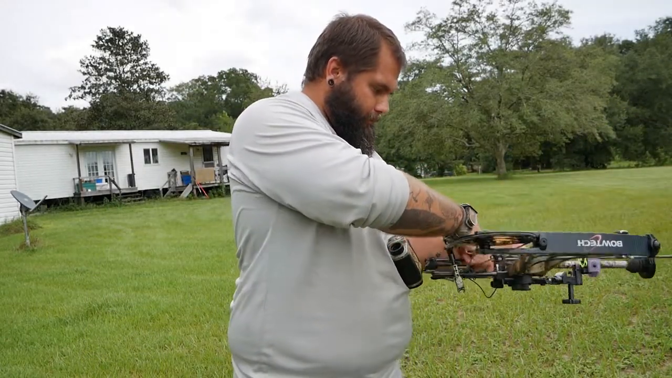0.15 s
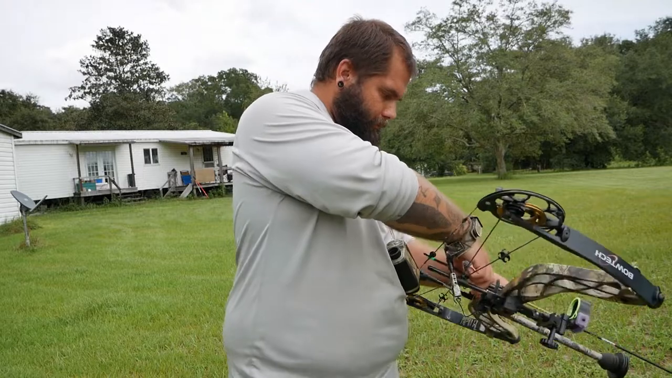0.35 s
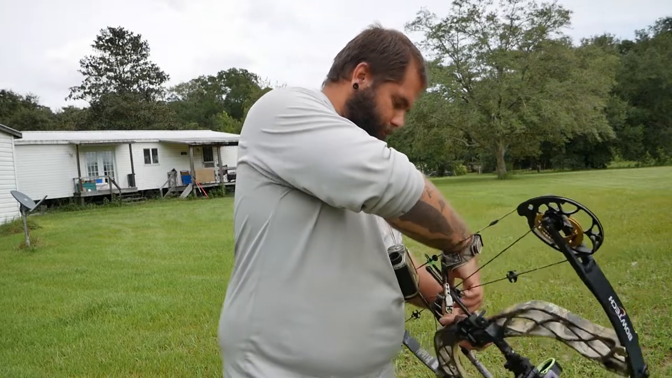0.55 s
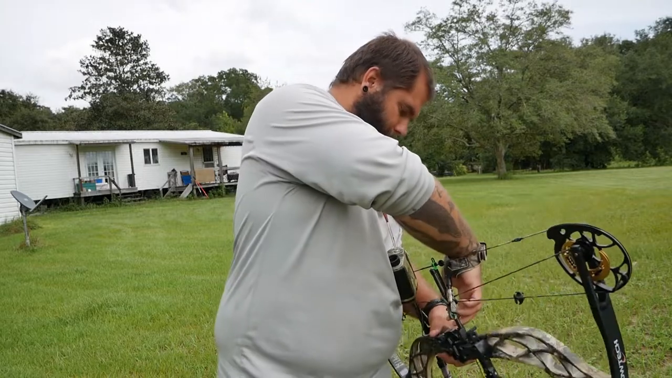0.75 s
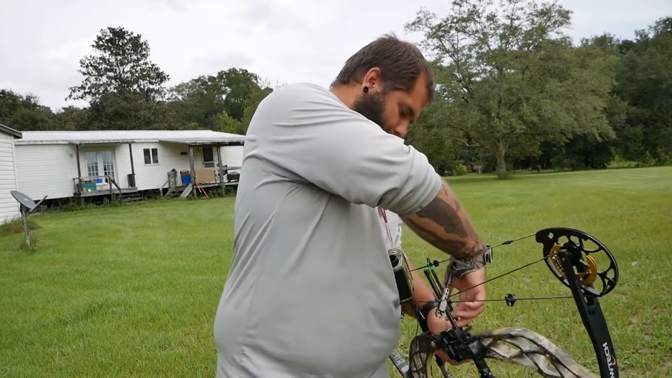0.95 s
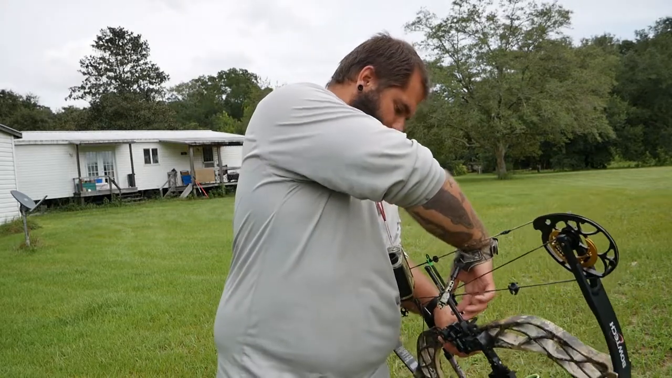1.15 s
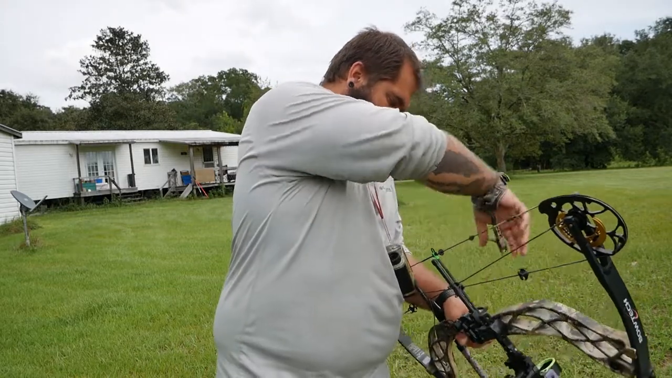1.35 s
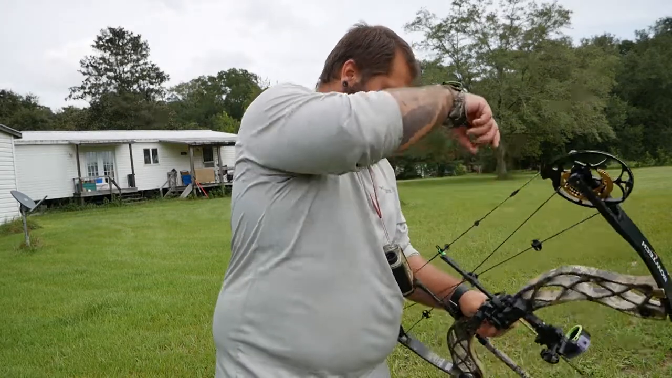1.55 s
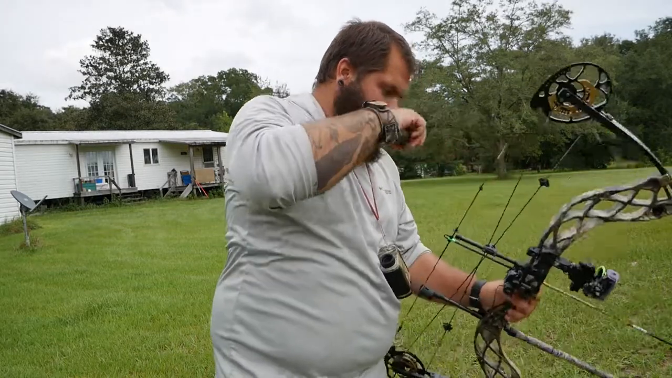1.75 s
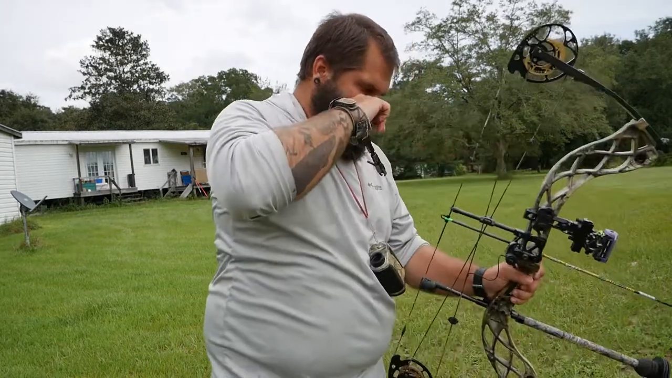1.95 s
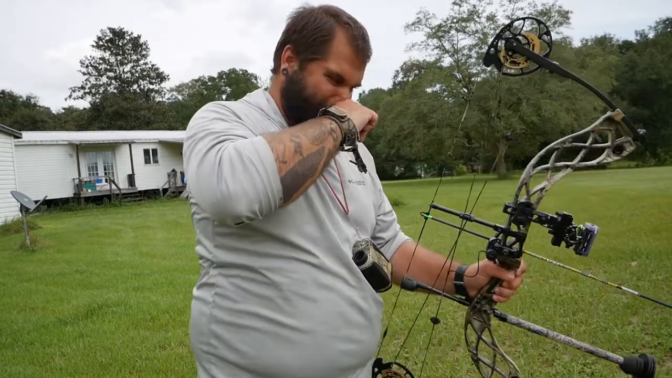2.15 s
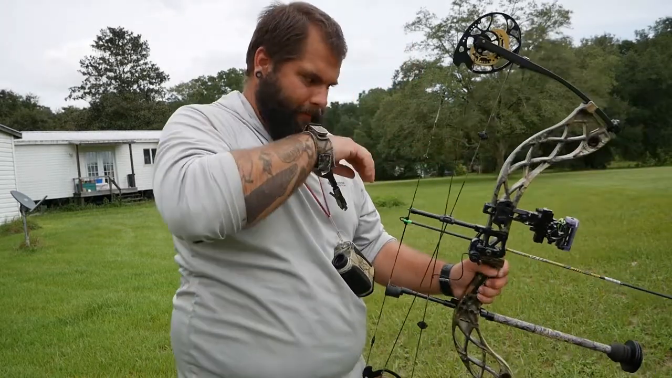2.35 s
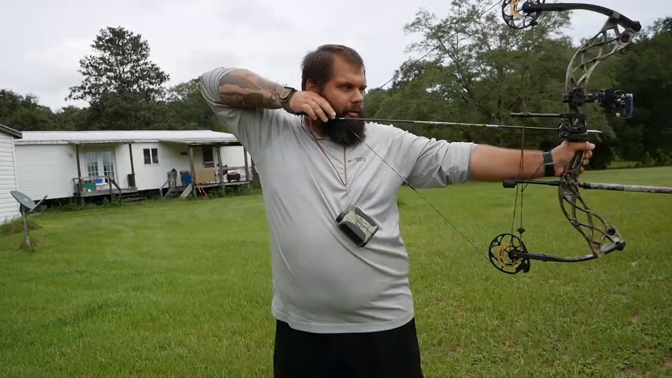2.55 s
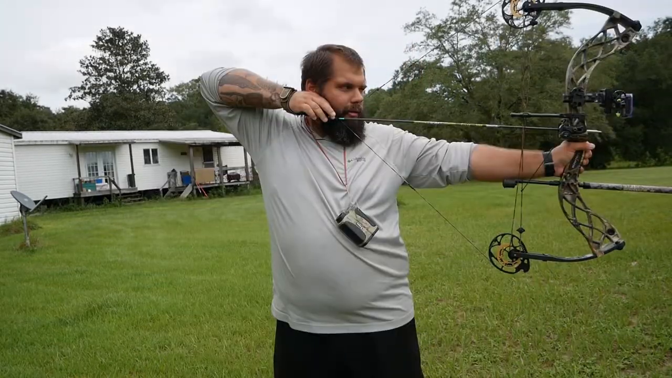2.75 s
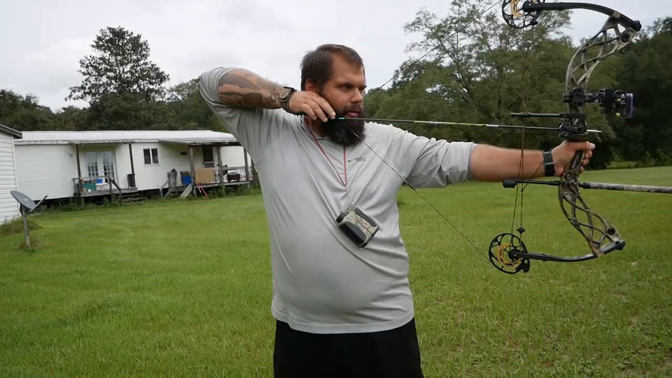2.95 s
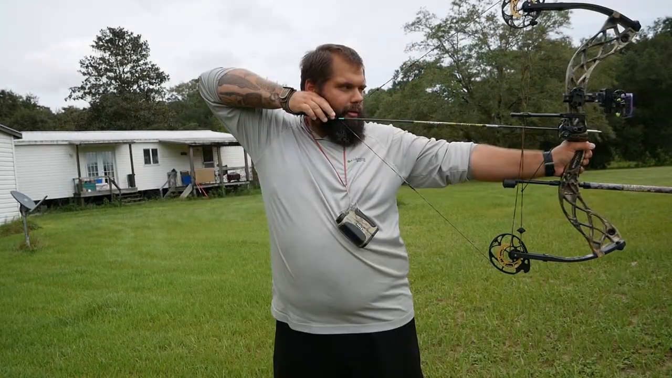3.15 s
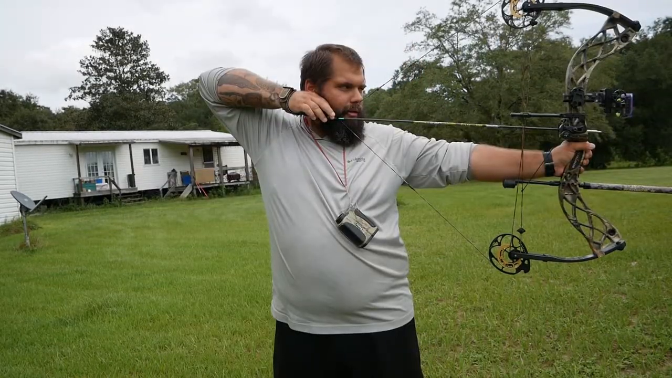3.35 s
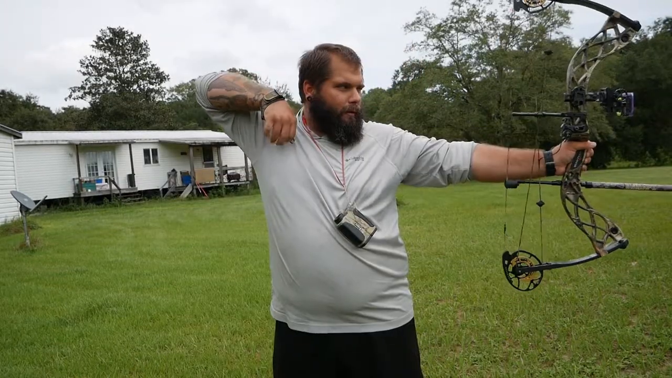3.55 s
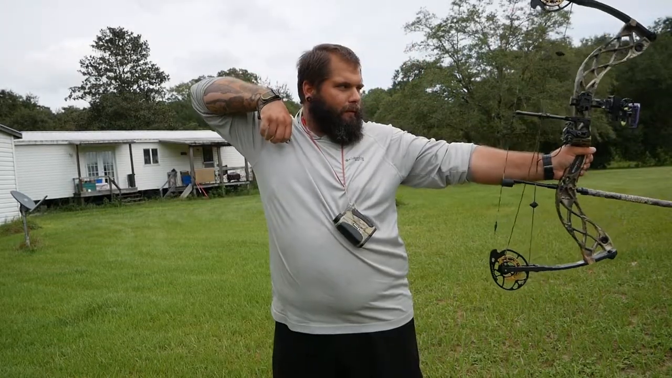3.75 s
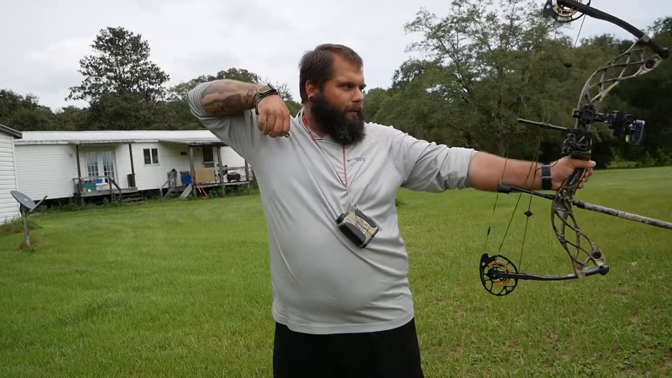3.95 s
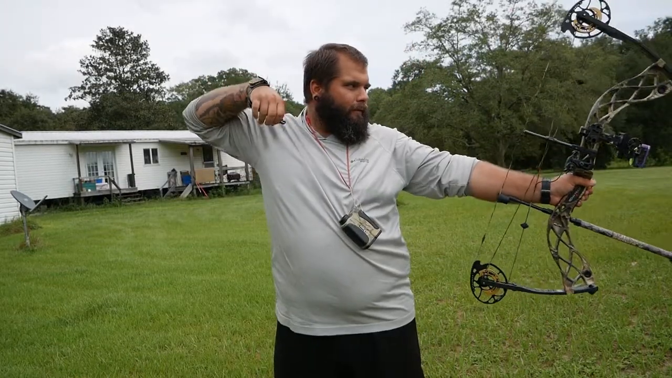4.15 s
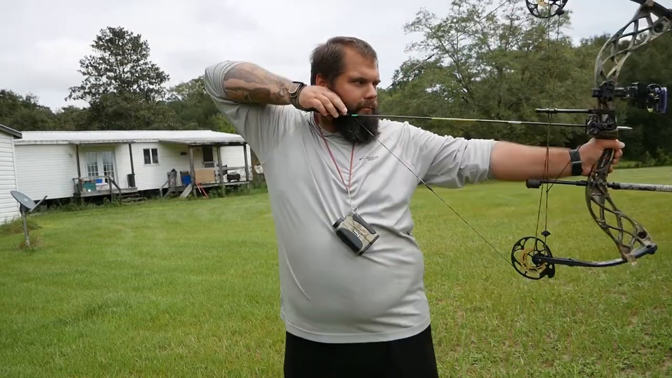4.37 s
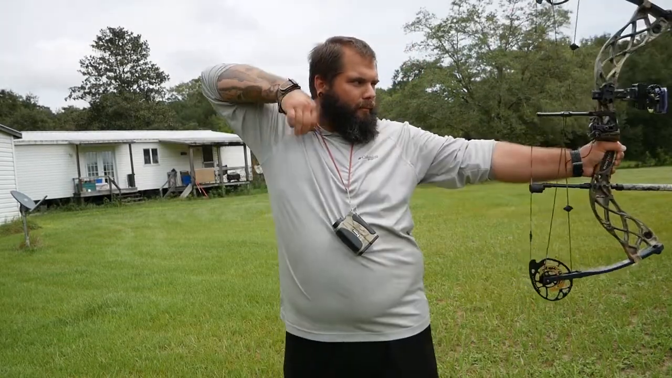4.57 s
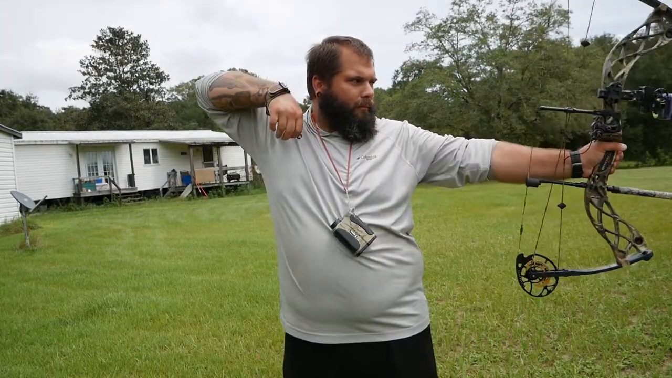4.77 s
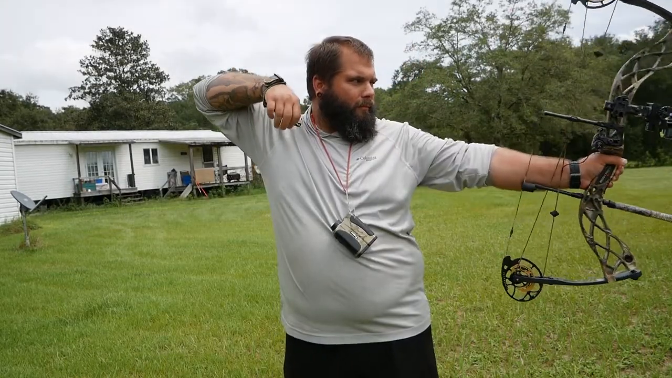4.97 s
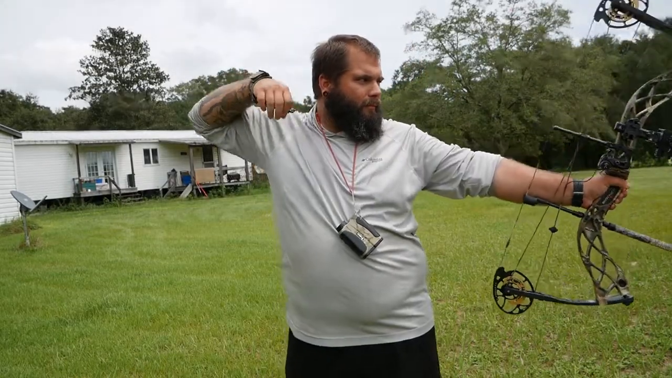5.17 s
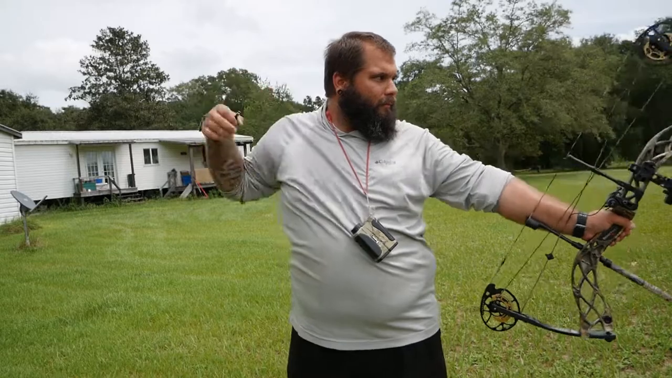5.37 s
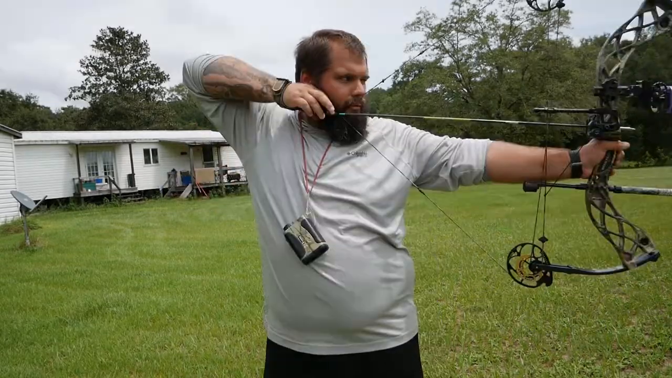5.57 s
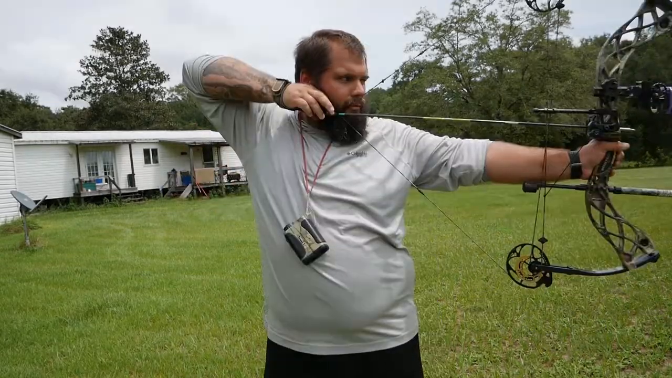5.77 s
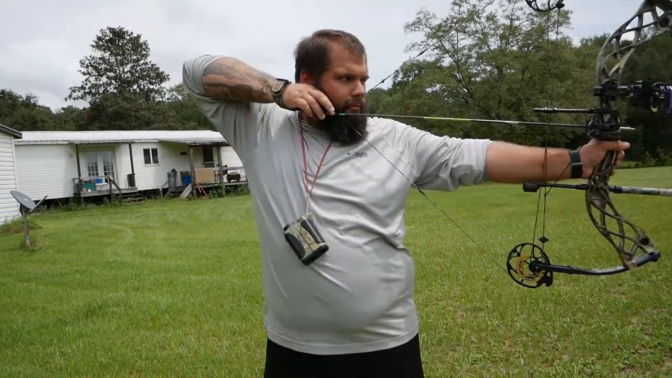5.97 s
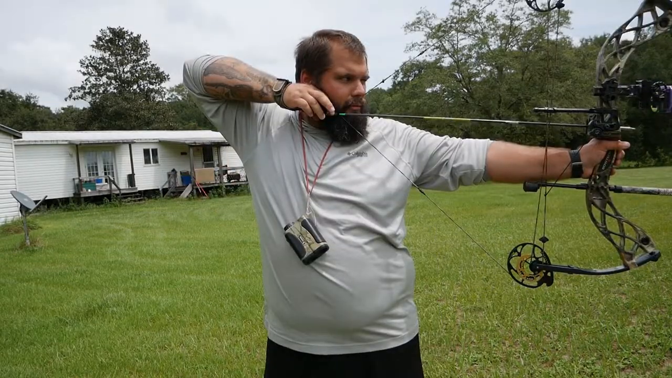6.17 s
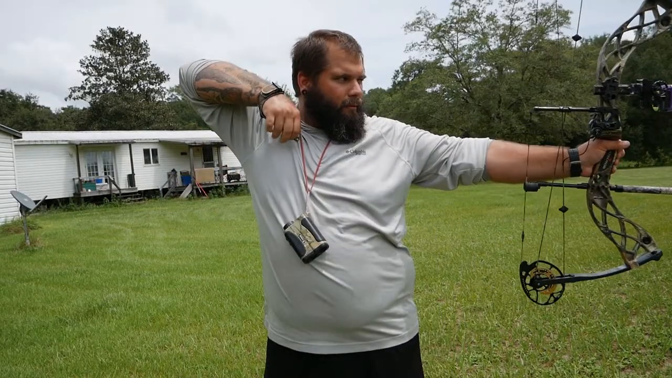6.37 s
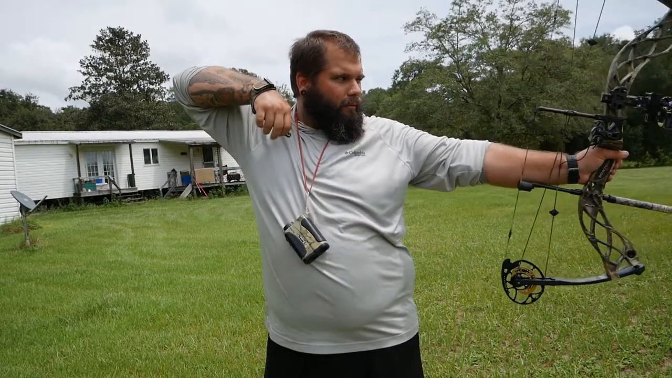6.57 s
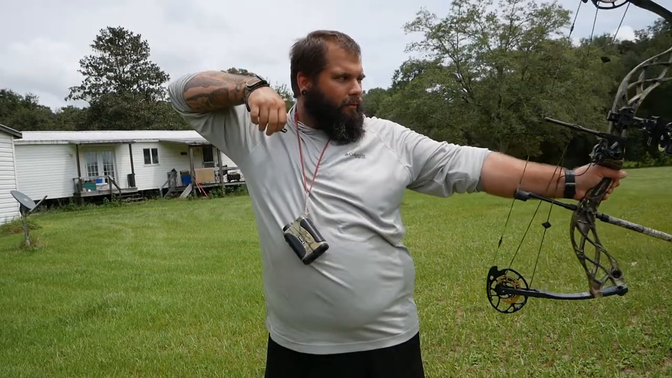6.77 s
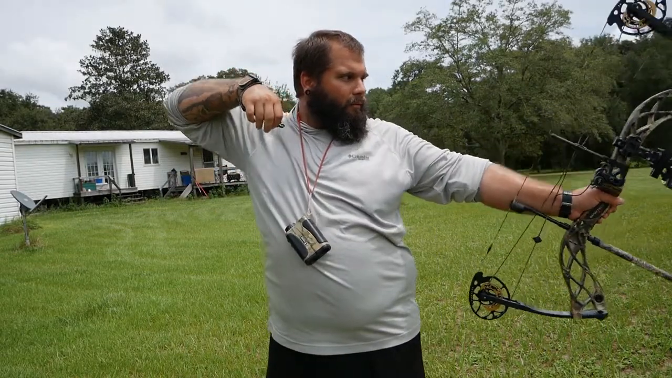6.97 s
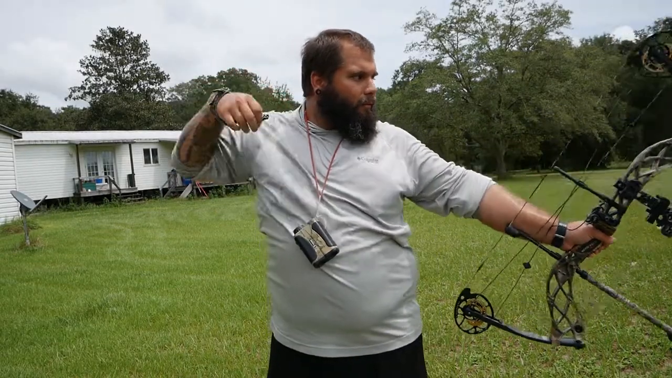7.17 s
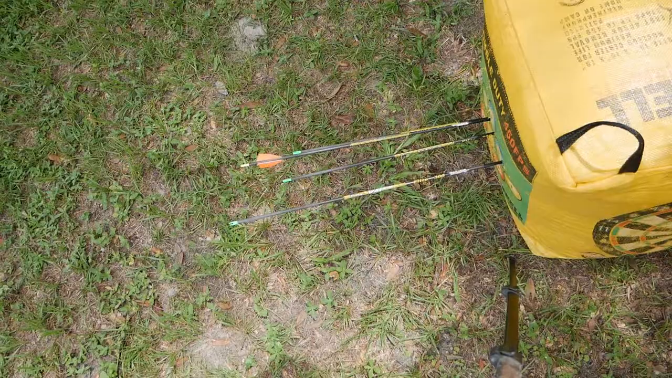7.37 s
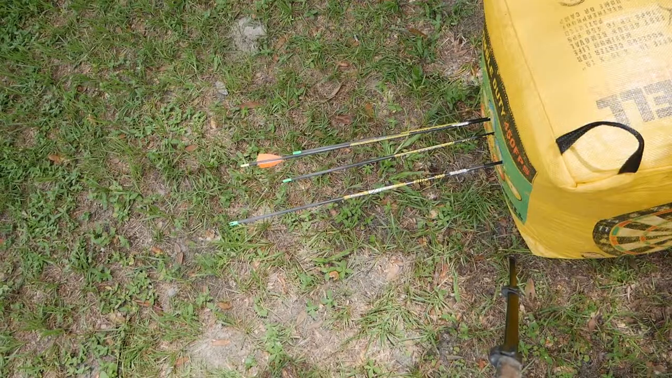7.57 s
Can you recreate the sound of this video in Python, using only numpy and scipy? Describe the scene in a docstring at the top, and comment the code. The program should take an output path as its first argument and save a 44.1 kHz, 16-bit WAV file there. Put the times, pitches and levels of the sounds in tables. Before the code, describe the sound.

Outdoors on a quiet lawn, soft air, a far low-mid roar and a gently swelling insect chorus lie very low. From 0.1 to 2.1 seconds small close metallic ticks of bow gear come irregularly, with a tiny squeak at 0.4 and faint sleeve rubbing around 1.8 to 2.0. At 2.5 the background cuts to a fainter chorus with a thin high trill, plus a tick; a barely audible bird chirps at 3.1. At 3.45 the bow snaps: clustered clacks, a quick rising scrape, a short twang near 410 hertz and buzzing rattle. At 3.62 the arrow hits the bag with a much louder, clipped, woody crack and brief boom, with faint tree echoes. The pair repeats at 4.54 and 4.71, then 6.25 and 6.42, these hits brighter. The ambience returns; from 7.36 a dull click, carried-microphone rumble and a grassy footstep rustle finish abruptly.

```python
"""Archery on a quiet lawn

An archer handles a compound bow, then shoots three arrows into a bag target. Noise bursts make the clacks,
decaying sines the twang, shaken noise the rattle and a gliding sine the arrow's scrape; minimum-phase pulses
and booming modes make the bag's crack. Diffuse echoes answer over shaped noise for air, a far roar and insects,
whose chorus cuts from one scene to a fainter next one before the first shot.
At the end the microphone is carried over the grass, with rumble and rustle."""
import sys
import numpy as np
from scipy import signal
from scipy.fft import irfft, next_fast_len
from scipy.io import wavfile

SR = 44100
rng = np.random.default_rng(int(sys.argv[2]) if len(sys.argv) > 2 else 0)


def waveform_to_disk(signal):
    """Save audio, clipped to [-1, 1], as 16-bit WAV at the path in sys.argv[1]."""
    frames = np.transpose(np.atleast_2d(signal))
    scaled = np.clip(frames, -1, 1) * 32767
    samples = np.round(scaled).astype(np.int16)
    wavfile.write(sys.argv[1], SR, samples)


N = 335777

# spectrum of the bow's buzzing loose parts: [hz, relative_db]
BUZZ_SPECTRUM = [(80, -30.5), (200, -1.5), (270, -5), (330, -15), (600, -2), (780, -11.5), (1000, -1),
                 (1500, -5.5), (1900, 1.5), (2450, -0.5), (2900, -4.5), (3450, 0), (4200, -12),
                 (5500, -24.5), (9000, -44)]


def gain_of(db):
    """Level: amplitude grows tenfold with every 20 dB."""
    return 10 ** (np.asarray(db) / 20)


def evened(x):
    """Normalisation: scales a signal to rms 1."""
    return x / np.sqrt(np.mean(x ** 2) + 1e-20)


def read(points, hz):
    """Spectral envelope: dB interpolated along a logarithmic frequency axis."""
    f, value = np.transpose(points)
    return np.interp(np.log(hz + 1), np.log(f + 1), value)


def add(mix, s, sound):
    """Superposition: adds a sound to the mix from time s in seconds."""
    part = mix[max(round(s * SR), 0):][:len(sound)]
    part += sound[:len(part)]


def hiss(colour, size):
    """Coloured noise: fixed spectral magnitudes with random phases, scaled to rms 1."""
    padded = next_fast_len(size, True)
    hz = np.fft.rfftfreq(padded, 1 / SR)
    phases = np.exp(2j * np.pi * rng.random(len(hz)))
    noise = irfft(gain_of(read(colour, hz)) * phases, padded)
    return evened(noise[:size])


def brighten(x, treble_db, corner_hz):
    """Shelving filter: a first-order split at the corner, with the upper part raised or lowered."""
    b, a = signal.butter(1, corner_hz, fs=SR)
    low = signal.lfilter(b, a, x)
    return low + gain_of(treble_db) * (x - low)


def waver(depth_db, per_s, size):
    """Random modulation: a gain drifting between random levels, per_s of them each second."""
    knots = rng.standard_normal(size // 16 + 2)
    place = np.arange(size) * per_s / SR
    return gain_of(depth_db * np.interp(place, np.arange(len(knots)), knots))


def envelope(t, start_s, attack_s, hold_s, t60):
    """Exponential decay: a gain rises to 1, holds, then falls 60 dB in t60 seconds."""
    u = t - start_s
    rise = np.clip(u / attack_s, 0, 1)
    return rise * gain_of(-60 * np.maximum(u - attack_s - hold_s, 0) / t60)


def swells(t, rows):
    """Amplitude modulation: Gaussian humps, each given by top_s, half_width_s and level_db."""
    return sum(gain_of(db) * np.exp(-((t - s) / width) ** 2) for s, width, db in rows)


def snap(colour, treble_db, corner_hz, size=4096):
    """Minimum phase: the Hilbert transform of the log gain makes one causal pressure pulse."""
    hz = abs(np.fft.fftfreq(size, 1 / SR))
    shelf_db = treble_db * hz ** 2 / (hz ** 2 + corner_hz ** 2)
    log_gain = np.log(gain_of(read(colour, hz) + shelf_db))
    spectrum = np.exp(np.conj(signal.hilbert(log_gain)))
    return np.fft.ifft(spectrum).real[:size // 2]


def tick(colour, db, treble_db, t60):
    """Impact of small hard parts: their dense modes act as a quickly decaying noise burst."""
    t = np.arange(4096) / SR
    burst = brighten(hiss(colour, len(t)), treble_db, corner_hz=7100)
    return burst * gain_of(db - 60 * t / t60)


def bow():
    """Impulsive release of elastic energy: each shot clacks, scrapes, twangs and rattles."""
    # releases of the string: [start_s, level_db]
    shots = [(3.4468, -1.66), (4.5413, -1), (6.2535, -1.04)]
    # release, cams, arrow rest, string stop, two as it settles; levels before the shot's own:
    # [after_release_s, level_db, treble_db]
    clacks = [(0.0, -32, 3), (.009, -42, 9), (0.0138, -29, 4), (0.0222, -28, 7.5), (.1160, -57, -1),
              (.1225, -65, 8)]
    # spectrum of the clacks: [hz, relative_db]
    clack_spectrum = [(300, -64), (1200, 6), (2200, -3.5), (4000, 3), (6500, -2), (9000, -7), (12000, -1.5),
                      (16000, -21)]
    out, t = np.zeros(N), np.arange(SR // 2) / SR
    grain = hiss(BUZZ_SPECTRUM, len(t))  # common to all shots
    for s, db in shots:
        shot = twang(t) + rattle(t, grain) + zip_off(t)
        for after, clack_db, treble_db in clacks + rebounds(count=3):
            add(shot, after, tick(clack_spectrum, clack_db, treble_db, t60=0.013))
        add(out, s, gain_of(db) * shot)
    return out


def twang(t, stop_s=.0235):
    """Modal vibration: the string hits its stop, and string, cables, limbs and riser ring."""
    # modes, detuned slightly at random in each shot: [pitch_hz, level_db, t60_s, swell_s]
    modes = [(213.7, -33.5, 0.16, 0.0048), (399, -24.5, 0.089, 0.0052), (412.7, -8.5, 0.11, 0.01),
             (425, -33, 0.37, 0.00977), (465, -17.5, 0.14, 0.0063), (515, -26.5, 0.18, 0.024),
             (654, -24.5, 0.128, 0.0056), (886, -12, 0.088, 0.013), (929, -18, 0.099, 0.0061),
             (948, -14.5, 0.091, 0.0088), (1058, -28.5, 0.14, 0.0093), (1338, -21, 0.074, 0.004),
             (1664, -29.5, .09, 0.0065), (1890, -23, 0.079, .006), (1960, -35.5, 0.045, .006),
             (2230, -26.5, 0.1, .006), (2390, -24.5, 0.14, .006), (2525, -19, 0.1, .007),
             (2860, -30, 0.13, .006), (3244, -23.5, 0.094, .006), (3410, -32, 0.12, .006),
             (4385, -29, 0.072, .006), (6024, -31, 0.08, .006), (7330, -32.5, 0.099, .006),
             (9460, -43, .11, .006)]
    u = np.maximum(t - stop_s, 0)
    out = np.zeros(len(t))
    for hz, db, t60, swell in modes:
        pitch_hz = hz * (1 + 0.0037 * rng.standard_normal())
        level = gain_of(db - 60 * u / t60) * (1 - np.exp(-u / swell))
        out += level * np.sin(2 * np.pi * pitch_hz * u)
    return out


def rattle(t, grain, string_hz=440, slap=0.5, alike=0.44):
    """Amplitude modulation: string swings shake loose parts whose grain is partly alike in every shot."""
    # spectrum of the fizzing small metal parts: [hz, relative_db]
    fizz_spectrum = [(2500, -14), (4800, 5), (6200, -0.5), (8500, -3), (10000, -2), (11500, 0), (13500, -6),
                     (15500, -17), (16500, -33)]
    jolt_s = 0.013
    running = t < jolt_s  # the string runs off the cams with a soft whirr
    # the limbs jolt the bow, then swing back and shake it once more
    shake = gain_of(-23) * envelope(t, jolt_s, attack_s=.009, hold_s=.018, t60=0.085)
    recoil = gain_of(-30.5) * envelope(t, 0.0552, attack_s=0.0039, hold_s=0.0036, t60=.026)
    body = gain_of(-46) * running + shake + recoil
    # small metal parts fizz with the shake and go on a little longer
    fizz = gain_of(-51) * running
    fizz = fizz + gain_of(-32) * envelope(t, jolt_s, attack_s=0.012, hold_s=0.019, t60=0.1)
    buzz = np.sqrt(alike) * grain + np.sqrt(1 - alike) * hiss(BUZZ_SPECTRUM, len(t))
    turns = np.cumsum(string_hz * waver(depth_db=0.5, per_s=198, size=len(t))) / SR
    swings = evened(2.0 + slap * np.cos(2 * np.pi * turns))
    flicker = waver(depth_db=1.5, per_s=980, size=len(t))
    return swings * (body * buzz + fizz * hiss(fizz_spectrum, len(t)) * flicker)


def zip_off(t, start_s=0.014, end_s=.025, from_hz=2300, to_hz=4200, db=-20):
    """Sliding friction: the arrow scrapes over its rest, its unsteady pitch rising as it gathers speed."""
    way = np.clip((t - start_s) / (end_s - start_s), 0, 1)
    hz = (from_hz + (to_hz - from_hz) * way) * waver(depth_db=1.8, per_s=1900, size=len(t))
    return gain_of(db) * np.sin(np.pi * way) * np.sin(2 * np.pi * np.cumsum(hz) / SR)


def rebounds(count):
    """Damped rebound: the string returns to its stop at even intervals, weaker each time."""
    first_s, every_s = .0295, .0142
    first_db, step_db, treble_db = -25.5, -1.5, -2.5
    return [(first_s + k * every_s, first_db + k * step_db, treble_db) for k in range(count)]


def bag(pierce_s=0.00026, cover_db=-7, ground_s=.0045, ground_db=-17):
    """Impact and resonance: the point pierces the cover, then drives into the stuffing, which booms."""
    # arrow strikes and the bag's recoil; side is +1 pushed out, -1 sucked in:
    # [start_s, level_db, treble_db, pitch_factor, boom_db, side]; boom_db adds to level_db
    strikes = [(3.6168, 26, -3.5, 0.98, -48, 1), (3.6245, 20, -29, 0.82, -52, -1),
               (3.6460, -1.5, -5, 0.57, -40, 1), (4.7100, 26.5, 5.5, 0.94, -59.5, 1),
               (4.7388, 5, -5, 0.68, -54, 1), (6.4232, 27.5, 3.5, 1, -66, 1), (6.4328, 5, -29, 1, -66, 1)]
    # spectrum of the crack before the pitch factor: [hz, relative_db]
    crack_spectrum = [(20, -68), (55, -38), (100, -17), (270, -6.5), (450, 1), (650, 0.5), (850, -5),
                      (1100, -12), (1700, -7), (2650, -9.5), (2950, -16), (3300, -11.5), (4200, -20.5),
                      (5000, -31.5), (10000, -40), (16000, -50)]
    # modes of the stuffed bag: [pitch_hz, relative_db, t60_s]
    boom_modes = [(74.6, -29, 0.1), (159, 0.5, 0.048), (290.6, 4, 0.063)]
    out, t = np.zeros(N), np.arange(SR // 4) / SR
    boom = sum(gain_of(db - 60 * t / t60) * np.cos(2 * np.pi * hz * t) for hz, db, t60 in boom_modes)
    boom = boom * (1 - np.exp(-t / pierce_s))
    for s, db, treble_db, pitch, boom_db, side in strikes:
        force = np.sign(side) * gain_of(db)
        crack = snap(np.array(crack_spectrum) * [pitch, 1], treble_db, corner_hz=1150)
        pulse = force * crack / (1 + gain_of(cover_db))  # shared between cover and stuffing
        # the pulse arrives directly, then turned over by its bounce off the soft ground
        for path_s, path in ((0, 1), (ground_s, -gain_of(ground_db))):
            add(out, s + path_s, path * gain_of(cover_db) * pulse)
            add(out, s + path_s + pierce_s, path * pulse)
        add(out, s, force * gain_of(boom_db) * boom)
    return out


def handling(ring_t60=0.029):
    """Impact and friction: the gear ticks, each time with one short ring, and a sleeve rubs."""
    # nock, release hook and fittings: [start_s, level_db, treble_db, ring_hz, ring_db]
    ticks = [(.1015, -49, -17, 3200, -46.5), (.5060, -59, -11, 3160, -52), (.7415, -47, -11, 2230, -46),
             (.7940, -49, 3, 10440, -48), (0.998, -52.5, -1, 11900, -61), (1.2070, -55, 0, 2520, -64),
             (1.42, -48.5, 5, 10800, -51), (1.429, -47.5, 7.5, 11800, -50), (1.5346, -56.5, 8, 10700, -56),
             (1.9120, -52.5, 3, 2700, -60), (2.130, -55, -17, 2700, -54), (2.5230, -51.5, -5, 3000, -67),
             (7.3770, -44, -23, 3470, -41.5)]
    # spectrum of the ticks: [hz, relative_db]
    tick_spectrum = [(500, -26), (1500, -3), (2300, 7.5), (3400, -2), (5000, -7), (8500, -16.5),
                     (10800, -9), (13000, -16), (16000, -16)]
    # rubs of the sleeve with each move of the arm: [top_s, half_width_s, level_db]
    rubs = [(.43, 0.044, -78), (1.8, .12, -66.5), (1.99, .14, -60), (2.46, .015, -63)]
    # spectrum of the sleeve: [hz, relative_db]
    sleeve_spectrum = [(500, -29), (1500, -3), (2500, 1.5), (4200, -7), (6500, -16), (9000, -28),
                       (15000, -33)]
    t = np.arange(N) / SR
    out = swells(t, rubs) * hiss(sleeve_spectrum, N) * waver(depth_db=2.5, per_s=70, size=N)
    u = t[:SR // 10]
    for s, db, treble_db, ring_hz, ring_db in ticks:
        add(out, s, tick(tick_spectrum, db, treble_db, t60=0.032))
        add(out, s, gain_of(ring_db - 60 * u / ring_t60) * np.sin(2 * np.pi * ring_hz * u))
    return out


def walk(start_s=7.362, attack_s=0.016, rumble_db=-53, grass_db=-59):
    """Structure-borne and friction noise: the carried microphone rumbles and grass rustles underfoot."""
    # spectrum of the rumble: [hz, relative_db]
    rumble_spectrum = [(20, -7), (60, -11), (120, 3.5), (250, -9.5), (550, -3), (1000, -29), (3000, -40),
                       (9000, -74)]
    # spectrum of the grass: [hz, relative_db]
    grass_spectrum = [(200, -20), (600, 17), (1500, 5), (3000, 7.5), (4500, -3.5), (7500, -5.5),
                      (8500, -15), (11500, -13), (15500, -33)]
    t = np.arange(N) / SR
    moving = np.clip((t - start_s) / attack_s, 0, 1)
    footstep = swells(t, [(7.55, 0.058, -57.5)])  # top s, half width s, dB
    grass = gain_of(grass_db) + footstep
    rustle = grass * hiss(grass_spectrum, N) * waver(depth_db=2, per_s=380, size=N)
    return moving * (gain_of(rumble_db) * hiss(rumble_spectrum, N) + rustle)


def whistles():
    """Frequency modulation: short, unsteady tones for a squeak and a bird's chirp."""
    # a squeak of the gear, then three close tones of a far bird:
    # [start_s, length_s, pitch_hz, unsteadiness_db, level_db]
    tones = [(.39, .055, 2480, .45, -56), (3.06, .09, 4090, .05, -75), (3.035, .14, 4310, .05, -72),
             (3.05, .12, 4520, .05, -73.5)]
    out = np.zeros(N)
    for s, length, hz, unsteady_db, db in tones:
        size = round(length * SR)
        turns = np.cumsum(hz * waver(unsteady_db, per_s=230, size=size)) / SR
        add(out, s, gain_of(db) * np.hanning(size) * np.sin(2 * np.pi * turns))
    return out


def yard(x):
    """Diffuse reflection: convolution with decaying noise for lawn, nearby things, house and trees."""
    # spectrum of the near scatter: [hz, relative_db]
    near_spectrum = [(20, -25), (100, -5), (250, 0), (500, -3.5), (900, 1), (2000, -5), (4000, 0),
                     (5500, 6.5), (9000, 0), (15000, 5), (18000, -18)]
    # spectrum of the late echo: [hz, relative_db]
    echo_spectrum = [(30, -19), (150, 7), (450, -8.5), (620, 0.5), (900, 0), (1350, 5.5), (2000, -1),
                     (2800, 5), (4000, 5.5), (5300, 12), (7000, 7), (10000, 3), (15000, 1), (18000, -12)]
    t = np.arange(SR) / SR
    lawn = gain_of(-36.5) * envelope(t, .002, attack_s=.0005, hold_s=0, t60=0.058)
    clutter = gain_of(-54.5) * envelope(t, 0.018, attack_s=0.0094, hold_s=0, t60=.13)
    # house and tree line; the echo holds while the sound crosses the depth of the trees
    trees = gain_of(-62) * envelope(t, .053, attack_s=0.015, hold_s=0.047, t60=0.63)
    response = (lawn + clutter) * hiss(near_spectrum, SR) + trees * hiss(echo_spectrum, SR)
    return signal.fftconvolve(x, response)[:N]


def outdoors():
    """Incoherent sum of many sources: shaped noise for air, a far roar, an insect chorus and one trill."""
    # spectrum of the still air: [hz, relative_db]
    air_spectrum = [(15, -46), (25, -21.5), (87, 0.5), (145, -3), (217, -2.5), (293, -7.5), (335, -8),
                    (373, -10.5), (476, -4), (695, -8.5), (1560, -15.5), (3160, -18), (4740, -28.5),
                    (14400, -43), (16000, -60)]
    # spectrum of the far roar: [hz, relative_db]
    roar_spectrum = [(100, -40), (300, -21), (480, -13.5), (620, -1.5), (720, 2.5), (900, -3), (1200, -9.5),
                     (2000, -49), (6000, -84)]
    # slow swells of the steady roar: [top_s, half_width_s, level_db]
    roar_swells = [(1.15, 1.35, -62), (4.1, 0.61, -71.5), (5.1, 0.55, -66), (7.58, 0.13, -59)]
    # spectrum of the insect chorus: [hz, relative_db]
    chorus_spectrum = [(500, -35), (1400, 1), (2000, 2.5), (2450, 6.5), (2850, -2), (3250, -1), (3900, -31),
                       (5500, -45), (7200, -39), (9000, -39), (14000, -50)]
    # spectrum of the high trill: [hz, relative_db]
    trill_spectrum = [(5500, -30), (6600, -1), (7300, -4.5), (8600, -14.5), (10000, -49)]
    t = np.arange(N) / SR
    air = gain_of(-58.5) * hiss(air_spectrum, N) * waver(depth_db=0.94, per_s=8, size=N)
    roar = (gain_of(-60) + swells(t, roar_swells)) * hiss(roar_spectrum, N)
    # the chorus grows slowly louder until the scene cuts at cut_s;
    # the next scene has a fainter, steady chorus and a high trill
    cut_s, peak_db, rise_db_per_s, steady_db = 2.52, -62, 2, -66
    chorus_db = np.where(t < cut_s, peak_db - rise_db_per_s * (cut_s - t), steady_db)
    chorus = gain_of(chorus_db) * hiss(chorus_spectrum, N) * waver(depth_db=1.65, per_s=30, size=N)
    trill_gain = gain_of(-84.5) * envelope(t, 2.53, attack_s=.02, hold_s=3.0, t60=.15)
    return air + roar + chorus + trill_gain * hiss(trill_spectrum, N)


def scene(bow_wet_db=-12, bag_wet_db=2):
    """Direct and reflected sound: the bow is close and dry, the bag stirs more echo; both channels alike."""
    shots, strikes = bow(), bag()
    echoes = yard(gain_of(bow_wet_db) * shots + gain_of(bag_wet_db) * strikes)
    mono = shots + strikes + echoes + handling() + walk() + whistles() + outdoors()
    return np.array([mono, mono])


def record(dry, self_noise_db=-80, edge_hz=16200):
    """Overload and band limiting: opposed hiss parts the channels, clipping flattens peaks, a low-pass follows."""
    # spectrum of the faint hiss: [hz, relative_db]
    self_noise_spectrum = [(20, 13), (100, -0.5), (350, 2), (700, -8), (1300, -2), (3000, -1), (8000, -5.5),
                           (11500, -8), (13000, -9)]
    apart = gain_of(self_noise_db) * hiss(self_noise_spectrum, N)
    loud = np.clip(dry + np.array([apart, -apart]), -.93, .93)
    low_pass = signal.firwin(511, edge_hz, window=("kaiser", 9), fs=SR)
    return signal.oaconvolve(loud, low_pass[None], "same")


dry = scene()
out = record(dry)
waveform_to_disk(out)
```